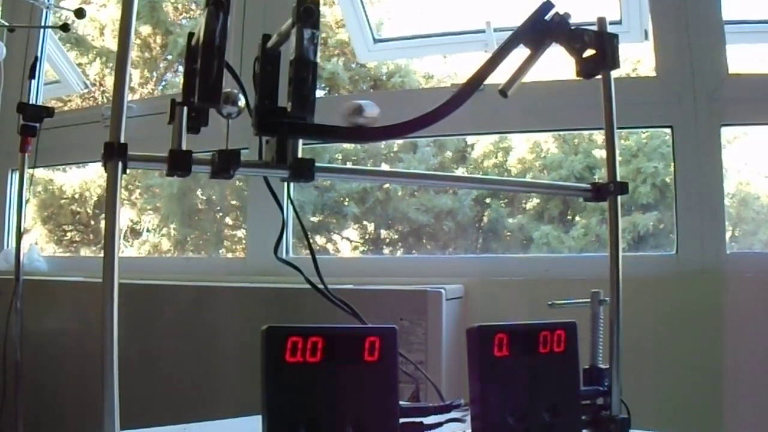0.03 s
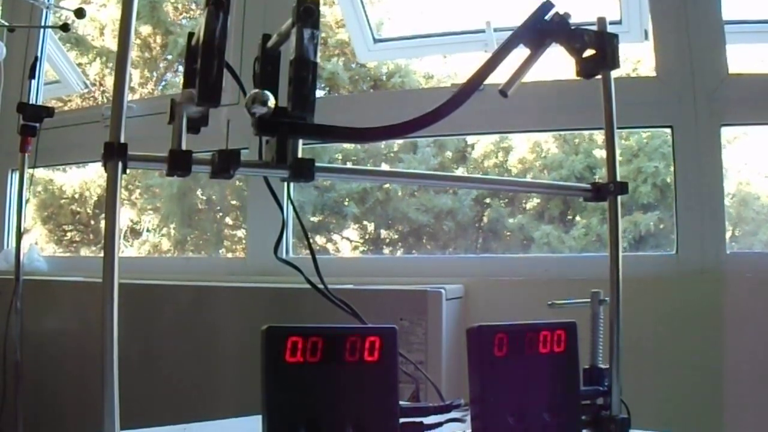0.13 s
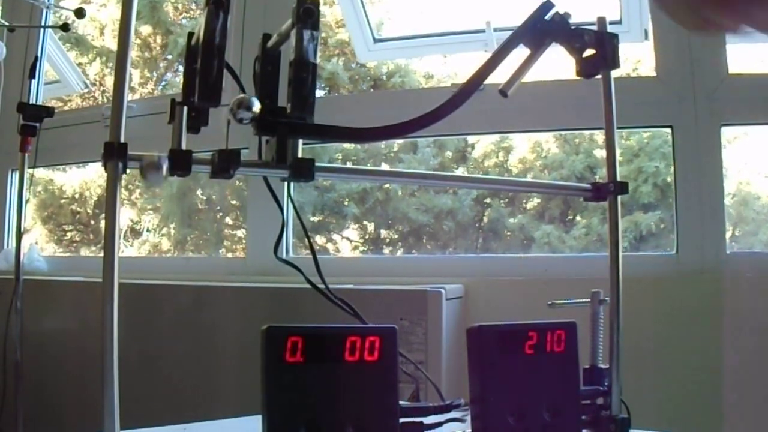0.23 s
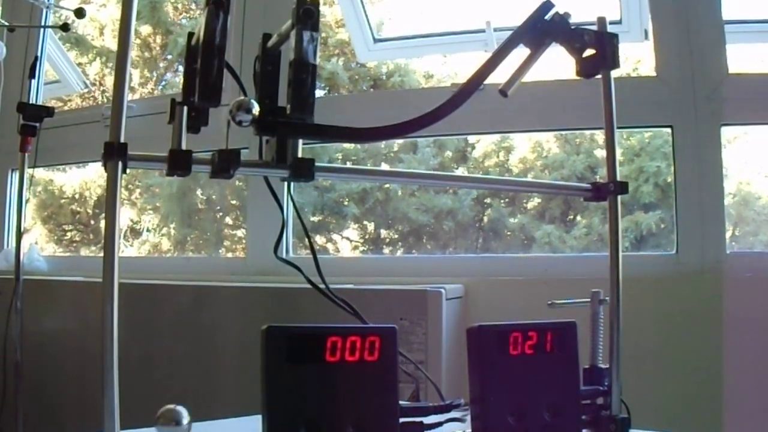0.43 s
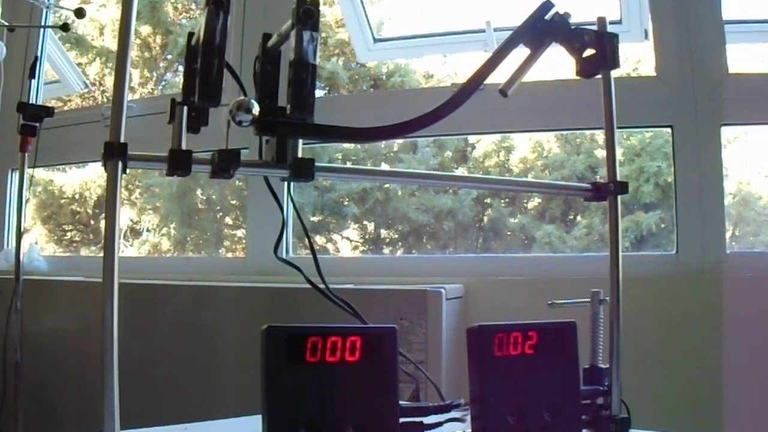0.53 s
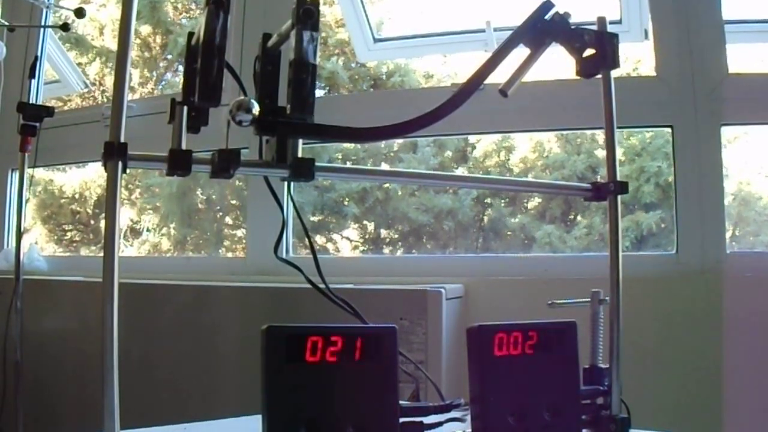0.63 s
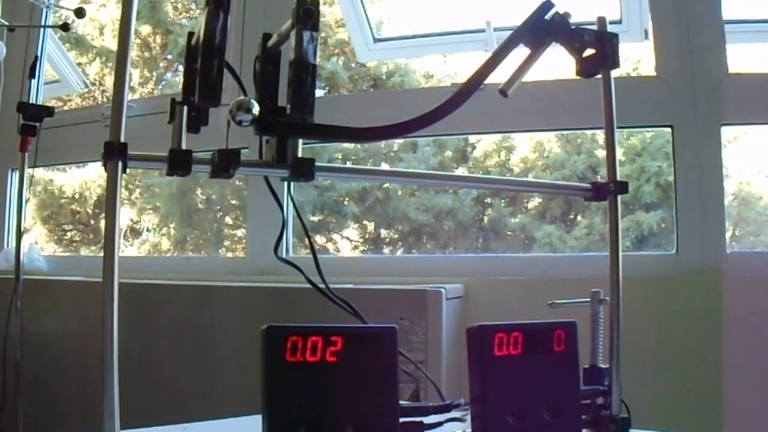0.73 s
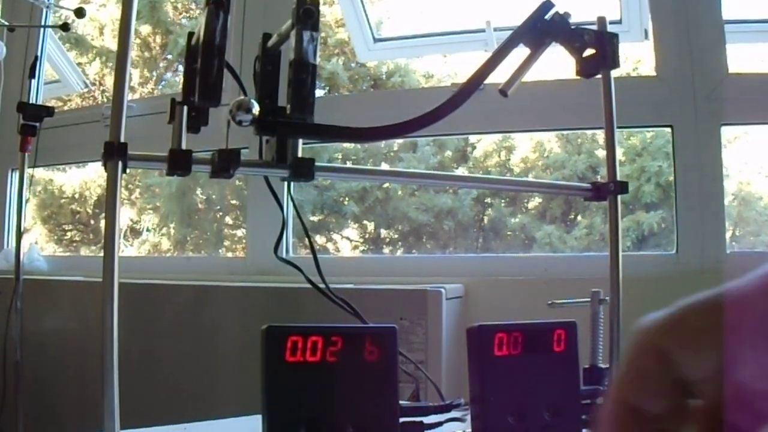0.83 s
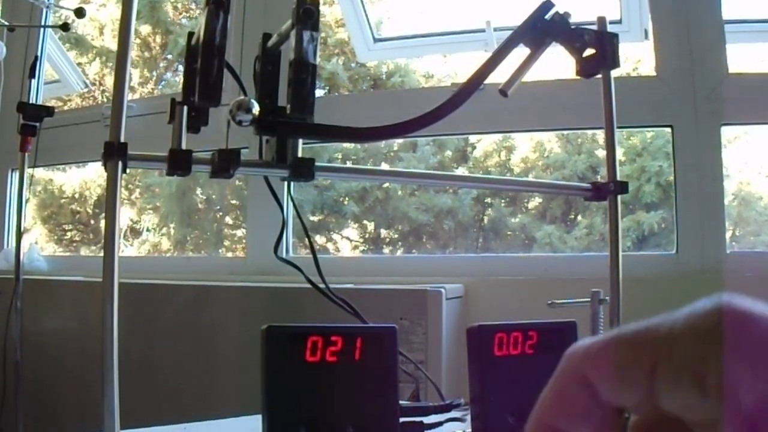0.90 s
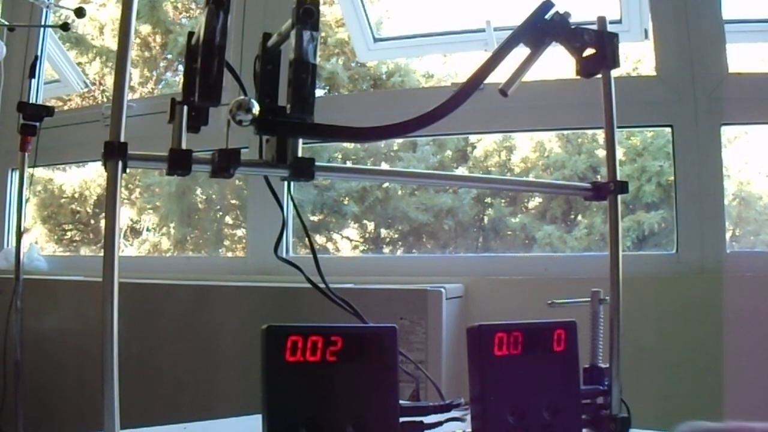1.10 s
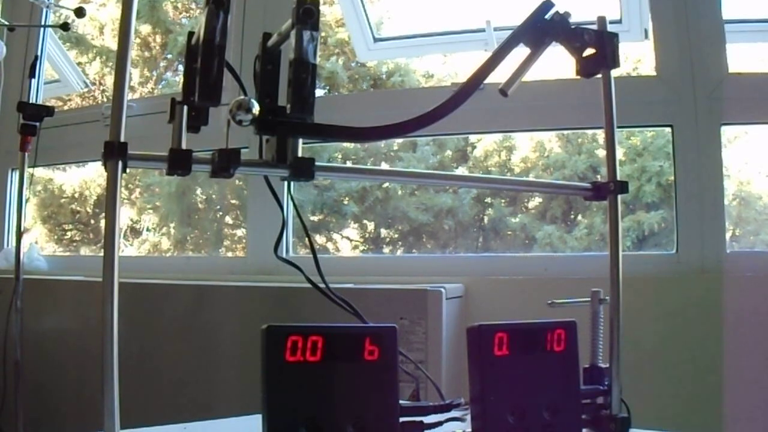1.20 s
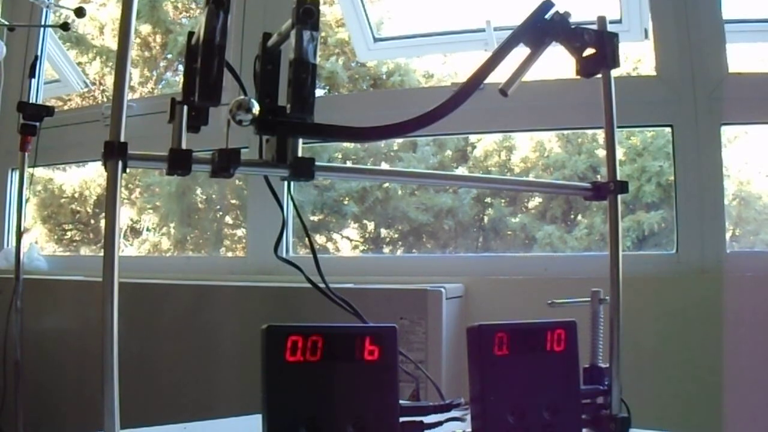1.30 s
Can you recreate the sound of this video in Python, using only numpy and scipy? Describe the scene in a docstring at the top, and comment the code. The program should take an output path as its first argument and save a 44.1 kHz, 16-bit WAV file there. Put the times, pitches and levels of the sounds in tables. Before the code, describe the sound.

Sharp, quickening bounces of a metal ball on a hard surface follow a short roll and a ringing double knock. Softer taps come last. The hard-walled room rings, and the loudest hits overload a small microphone.

```python
"""A steel ball rumbles down a curved track in a hard-walled lab and knocks into a second ball.
The track rings, its stand shudders and its fittings buzz. A ball drops onto a hard surface and
bounces ever faster; a few duller taps follow. Rolling is uneven noise through resonances; each blow
is a click, a clatter and dying modes. The room rings on over a steady background noise, and the
loudest blows overload a small narrow-band microphone, which adds a low thump."""
import sys
import numpy as np
from scipy import signal
from scipy.fft import rfft, irfft
from scipy.io import wavfile
from scipy.ndimage import uniform_filter1d

SR = 44100
rng = np.random.default_rng(int(sys.argv[2]) if len(sys.argv) > 2 else 0)


def digitize_waveform(pressure):
    """Quantize a signal to 16-bit integers and store it at the path in sys.argv[1].

    Rows of a 2-D input are taken as channels; values are limited to [-1, 1].
    """
    field = np.atleast_2d(pressure).T
    bounded = np.clip(field, -1, 1)
    quanta = np.round(bounded * 32767).astype(np.int16)
    wavfile.write(sys.argv[1], SR, quanta)


N = 59535
T = np.arange(N) / SR
HZ = np.fft.rfftfreq(2 * N, 1 / SR)

# Each row: start in seconds, level in dB, treble corner in Hz, then clatter, surface ring, room and
# microphone overload thump trims in dB.
BALL_BOUNCES = [(.4435, 14, 5000, 4.5, 4, 4, -25), (.6166, 11.5, 14000, -1, -2.5, -1.5, -19.5),
                (.7042, 2.5, 10000, 4, -8.5, -14, -37), (.7523, -4.5, 4700, -3, 4, -10, -55),
                (.7819, -11, 4300, -14, 1, 2, -54), (.8003, -18.5, 4000, 3, 7.5, 8.5, -53),
                (.8115, -17, 4000, -20, -13, -2, -51), (.8200, -29, 4000, 1, -5, -6, -53.5)]
# Each row: start in seconds, level in dB, treble corner in Hz, track ring trim in dB.
BALL_KNOCKS = [(.2488, -1, 5500, 4), (.2752, -0.37, 3170, 0)]
# Each row: start in seconds, level in dB, treble corner in Hz, click trim in dB.
DULL_TAPS = [(.991, -22, 4000, -17), (1.1005, -17, 3300, -18), (1.117, -20.5, 3000, -16),
             (1.1742, -13.5, 4230, 0), (1.2237, -15.5, 2900, -3.5), (1.2775, -18.5, 2700, -3),
             (1.282, -19, 2800, -18), (1.3076, -20, 2370, -4)]
# Modes of the struck parts. Each row: frequency in Hz, relative level in dB, T60 in seconds.
SURFACE_MODES = [(263.3, -36, 0.29), (341.4, -45.5, 0.75), (521, -23, 0.081), (663, -28.5, 0.057),
                 (844, -31, 0.084), (1171, -40.5, 0.41), (1372, -44, 0.12), (1635, -46, 0.34),
                 (1790, -43, .45), (1878, -41, .3), (1946, -43, .4), (2115, -40, 0.75), (2350, -62.5, 0.25),
                 (2660, -38, 0.43), (2800, -41, 0.29), (3338, -39, 0.24), (3770, -52, 0.237),
                 (4200, -39, 0.23)]
TRACK_MODES = [(260, -23, .12), (329.4, -26, 0.18), (575, -25.5, .09), (747, -31, .08), (967, -26.5, 0.13),
               (1535, -27, 0.076), (1964, -21, .08), (2120, -41.5, 0.24), (2356, -16.5, 0.056),
               (2670, -35.5, .04), (4070, -28, 0.14), (4440, -31.5, 0.13)]
BUMP_MODES = [(509.4, -26, 0.12), (612, -20.5, 0.053), (1860, -23, 0.042), (1980, -14.5, 0.016)]
TAP_MODES = [(263.8, -24, 0.2), (413, -25, 0.3), (624.5, -25.5, 0.45), (979, -19.5, 0.22),
             (1075, -30.5, .16), (1227, -20.5, 0.23), (2420, -18, 0.073), (2610, -13.5, 0.062)]
# Resonances of the shaken parts. Each row: centre in Hz, half-width in Hz, relative level in dB.
ROLL_RESONANCES = [(306, 130, -8.5), (657, 47, -11), (1040, 88, -10), (1715, 77, 0), (2330, 83, -2.5),
                   (3290, 78, -10.5), (3850, 160, -6.5), (4425, 140, -7.5), (5340, 220, -15)]
STAND_RESONANCES = [(100, 50, -15), (260.7, 8.3, -5.5), (353, 75, -6), (640, 130, -7.5)]
FITTING_RESONANCES = [(1350, 200, -4), (2500, 160, 0.5), (3400, 300, -3), (4160, 28, -2), (4330, 65, -6.5),
                      (5200, 300, -14)]
# Loudness of the shaken parts. Each row: time in seconds, level in dB.
ROLL_ENVELOPE = [(0, -43), (.04, -35.5), (0.087, -33), (0.141, -37), (0.174, -37), (.2, -40.5), (.23, -51),
                 (.3, -78)]
STAND_ENVELOPE = [(.12, -68), (0.189, -39), (0.236, -40), (.29, -36.5), (.37, -40), (.44, -44), (.6, -39),
                  (.85, -66)]
FITTING_ENVELOPE = [(.25, -71.5), (.28, -28.5), (.315, -40.5), (.345, -41), (.372, -38.5), (.4, -45),
                    (.44, -44.5), (.5, -80)]
# Spectra of contacts, room and background. Each row: frequency in Hz, relative density in dB.
BOUNCE_SPECTRUM = [(30, -35.5), (80, -24), (160, -18), (300, -8), (600, -6.5), (1200, -1), (2200, 2.5),
                   (3200, -0.5), (4500, -3), (5300, -1.5), (6000, -10.5)]
KNOCK_SPECTRUM = [(30, -43), (70, -40.5), (140, -14.5), (300, -4), (600, -5), (1100, -3.5), (2000, 4.5),
                  (2500, 0), (3100, -5.5), (4500, -3.5), (6000, -7)]
TAP_SPECTRUM = [(40, -41), (170, -32), (350, 0), (700, -4), (1100, 2), (1500, -3.5), (2500, 2.5),
                (3200, -10.5), (4500, -17.5), (6000, -28)]
ROOM_SPECTRUM = [(40, -43), (170, -10), (300, -3), (600, -7.5), (1200, -8), (2200, -3), (3200, -7),
                 (4500, -7.5), (6000, -15)]
FLOOR_SPECTRUM = [(20, -7), (60, -17.5), (110, -15), (200, -12), (280, -5), (600, 1.5), (1100, -3),
                  (2200, -8.5), (3500, -41.5), (5000, -31), (6000, -31.5)]
# Room decay. Each row: frequency in Hz, T60 in seconds.
ROOM_DECAY = [(100, 0.5), (300, 0.5), (700, 1.03), (2000, 1.52), (3500, 1.36), (5500, 0.73)]
# Microphone treble loss. Each row: frequency in Hz, gain in dB.
MIC_RESPONSE = [(4800, -1), (5300, -2), (5800, -10), (6150, -22), (6500, -60), (7200, -91)]


def bounce(level_db, corner_hz, clatter_db, ring_db, room_db, mic_thump_db, echo_hz=2164):
    """Ball on a hard surface: crack, clatter, ringing modes, room and a near reflection."""
    gain = spectrum(BOUNCE_SPECTRUM) * soft_contact(corner_hz)
    crack = amp(2) * click(gain) + amp(-4) * noise(gain) * decay(0.018)
    clatter = amp(clatter_db - 18) * noise(gain) * decay(0.064) * rise(0.0013)
    surface = amp(ring_db) * ring(SURFACE_MODES)
    tail = amp(room_db - 35) * room(spectrum(ROOM_SPECTRUM))
    sound = crack + clatter + surface + tail + amp(mic_thump_db) * mic_thump()
    reflection = amp(2.5) * np.sin(2 * np.pi * echo_hz * T) * decay(0.0067) * rise(0.00067)
    add(sound, reflection, start_s=0.0029)
    return amp(level_db) * sound


def knock(level_db, corner_hz, ring_db):
    """Steel on steel: click, short clatter of the fittings, ringing track and room."""
    gain = spectrum(KNOCK_SPECTRUM) * soft_contact(corner_hz)
    clatter = amp(-7) * noise(gain) * decay(0.037) * rise(0.00021)
    track = amp(ring_db) * ring(TRACK_MODES)
    return amp(level_db) * (amp(-11) * click(gain) + clatter + track + amp(-38) * room(gain))


def tap(level_db, corner_hz, click_db):
    """A light, dull contact rings a small set of modes and the room."""
    gain = spectrum(TAP_SPECTRUM) * soft_contact(corner_hz)
    clatter = amp(-13) * noise(gain) * decay(0.04) * rise(0.00059)
    body = amp(-4) * ring(TAP_MODES)
    return amp(level_db) * (amp(click_db) * click(gain) + clatter + body + amp(-30) * room(gain))


def ramp_bump():
    """The ball scrapes over the hollow bump at the foot of the ramp and rings it."""
    return ring(BUMP_MODES) + amp(-27) * noise(spectrum(KNOCK_SPECTRUM)) * decay(0.033)


def rubbing(resonances, envelope, grit_db, flutter_depth, flutter_hz):
    """Uneven rubbing shakes a set of resonances; its grit is also heard directly."""
    body = sum(amp(db) * noise(1 / (1 + ((HZ - hz) / half_width_hz) ** 2))
               for hz, half_width_hz, db in resonances)
    flutter = np.exp(flutter_depth * noise(1 / (1 + (HZ / flutter_hz) ** 4)))
    grit = amp(grit_db) * noise(spectrum(BOUNCE_SPECTRUM))
    level_db = np.interp(T, *np.transpose(envelope))
    return (unit(body) + grit) * flutter * amp(level_db)


def ring(modes, blur_hz=14):
    """Dying sines of a struck object; loose joints blur each line."""
    sound = np.zeros(N)
    for hz, db, t60_s in modes:
        wander_rad = np.cumsum(rng.standard_normal(N)) * np.sqrt(2 * np.pi * blur_hz / SR)
        phase_rad = 2 * np.pi * (hz * T + rng.random()) + uniform_filter1d(wander_rad, size=441)
        sound += amp(db) * decay(t60_s) * rise(1 / hz) * np.sin(phase_rad)
    return sound


def click(gain):
    """Contact pulse: causal, peak 1, built from the given spectrum."""
    cepstrum = irfft(np.log(gain + 1e-5))
    log_minimum_phase = rfft(2 * cepstrum[1:N], 2 * N) * np.exp(-2j * np.pi * HZ / SR)
    pulse = irfft(np.exp(log_minimum_phase))[:N]
    return pulse / abs(pulse).max()


def soft_contact(corner_hz):
    """A softer contact loses treble."""
    return 1 / np.sqrt(1 + (HZ / corner_hz) ** 4)


def mic_thump(length_s=0.007):
    """Low thump of the overloaded microphone on the loudest bounces: a half sine."""
    return np.sin(np.pi * np.minimum(T / length_s, 1))


def room(gain):
    """Diffuse tail; each band dies at its own rate."""
    diffuse = rfft(rng.standard_normal(2 * N)) * gain
    bands_hz = np.geomspace(100, 6000, 7)
    tail = np.zeros(N)
    for hz, share in zip(bands_hz, np.eye(len(bands_hz))):
        band_gain = lookup(list(zip(bands_hz, share)), HZ)
        tail += irfft(diffuse * band_gain)[:N] * decay(lookup(ROOM_DECAY, hz))
    return tail / np.std(irfft(diffuse)) * rise(0.0031)


def background(level_db=-44.5):
    """Steady noise of the quiet room."""
    return amp(level_db) * noise(spectrum(FLOOR_SPECTRUM))


def noise(gain):
    """Noise of rms 1 with the given spectrum."""
    return unit(irfft(rfft(rng.standard_normal(2 * N)) * gain)[:N])


def spectrum(table, cutoff_hz=6500):
    """Gain per frequency bin, cut steeply above the microphone's range."""
    return amp(lookup(table, HZ)) / np.sqrt(1 + (HZ / cutoff_hz) ** 24)


def lookup(table, hz):
    """Interpolates on a log-frequency axis."""
    points_hz, values = np.transpose(table)
    return np.interp(np.log(hz + 1), np.log(points_hz + 1), values)


def decay(t60_s):
    """Falls 60 dB in t60_s."""
    return np.exp(-np.log(1000) * T / t60_s)


def rise(tau_s):
    """Soft onset."""
    return 1 - np.exp(-T / tau_s)


def amp(db):
    """Decibels to gain."""
    return 10 ** (np.asarray(db) / 20)


def unit(x):
    """Scales to rms 1."""
    return x / np.sqrt(np.mean(x ** 2) + 1e-20)


def add(mix, sound, start_s):
    """Mixes a sound in at start_s."""
    part = mix[round(start_s * SR):]
    part += sound[:len(part)]


def scene():
    """Rolling, shaken stand and fittings, bump, knocks, bounces and taps over the quiet room."""
    mix = background()
    mix += rubbing(ROLL_RESONANCES, ROLL_ENVELOPE, grit_db=-9, flutter_depth=0.25, flutter_hz=71)
    mix += rubbing(STAND_RESONANCES, STAND_ENVELOPE, grit_db=-8.5, flutter_depth=0.15, flutter_hz=45)
    mix += rubbing(FITTING_RESONANCES, FITTING_ENVELOPE, grit_db=-4.5, flutter_depth=0.15, flutter_hz=45)
    add(mix, ramp_bump(), start_s=0.1858)
    for events, source in (BALL_KNOCKS, knock), (BALL_BOUNCES, bounce), (DULL_TAPS, tap):
        for start_s, *settings in events:
            add(mix, source(*settings), start_s)
    return mix[None]


def record(dry):
    """The microphone saturates and loses treble; overshoot is clipped, then band-limited."""
    overload, ceiling, edge_hz = 0.73, 0.715, 16300
    saturated = dry / (1 + (dry / overload) ** 8) ** (1 / 8)
    narrow = irfft(rfft(saturated, 2 * N) * amp(lookup(MIC_RESPONSE, HZ)))
    clipped = np.clip(narrow, -ceiling, ceiling)
    lowpass = signal.firwin(255, edge_hz, window=("kaiser", 9), fs=SR)
    return signal.oaconvolve(clipped, lowpass[None], "same")[:, :N]


dry = scene()
out = record(dry)
digitize_waveform(out)
```